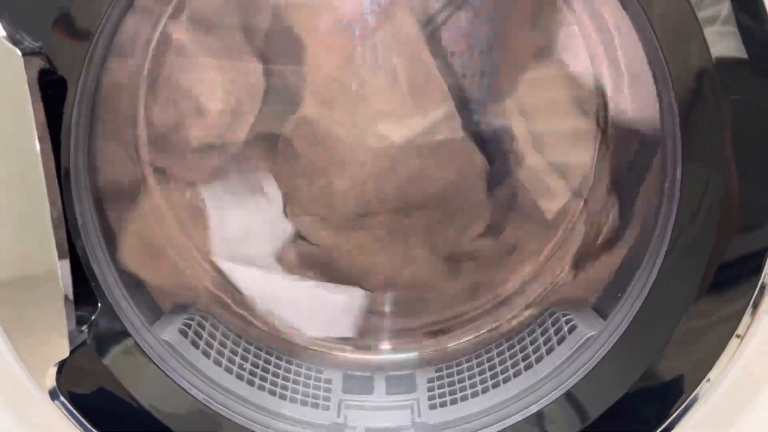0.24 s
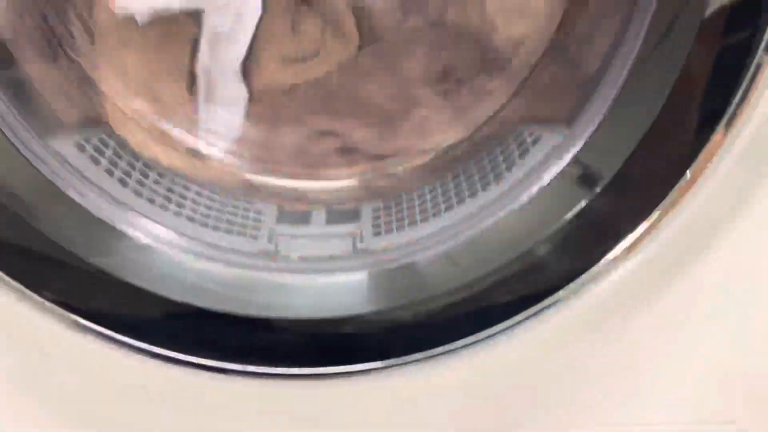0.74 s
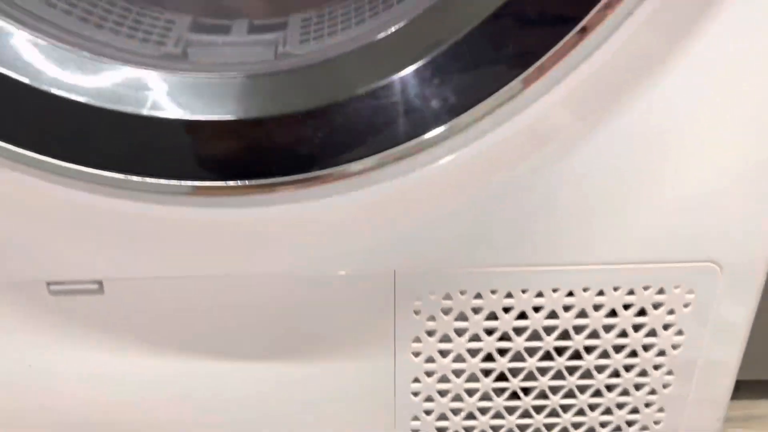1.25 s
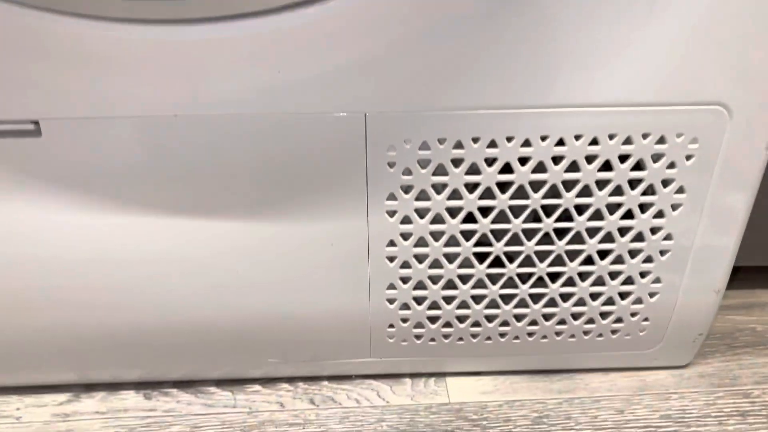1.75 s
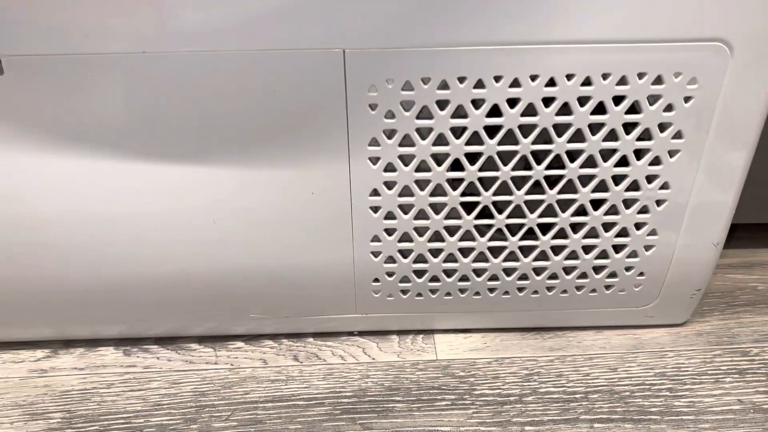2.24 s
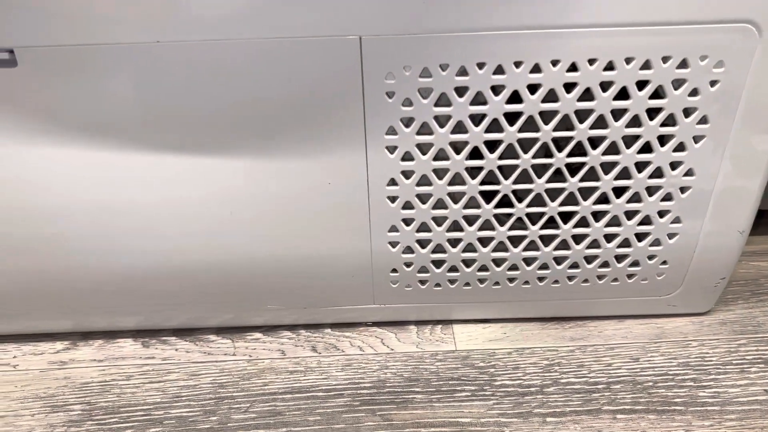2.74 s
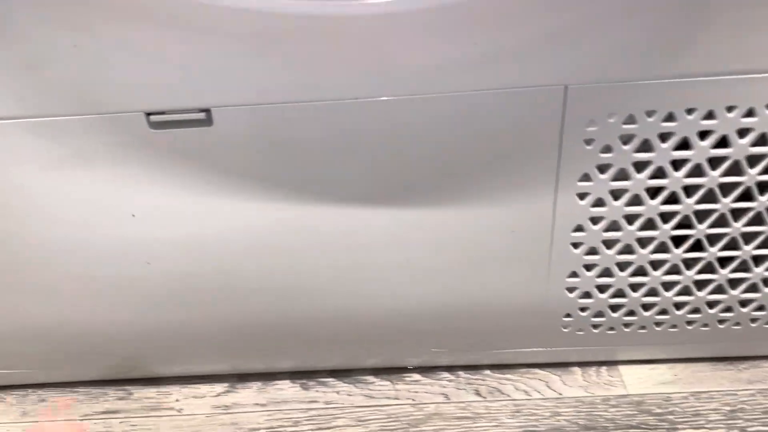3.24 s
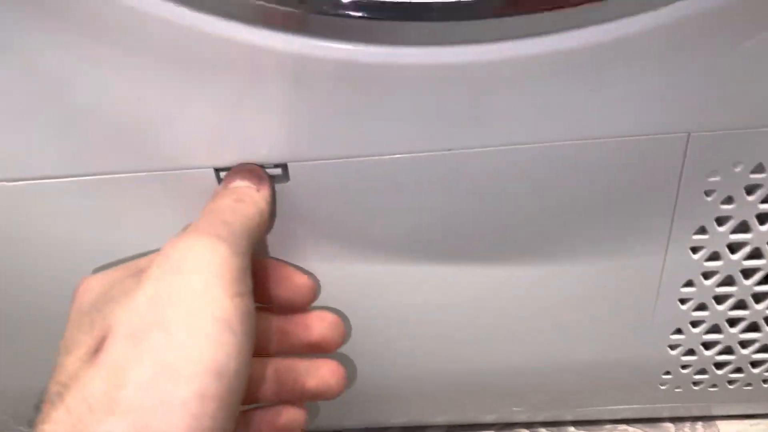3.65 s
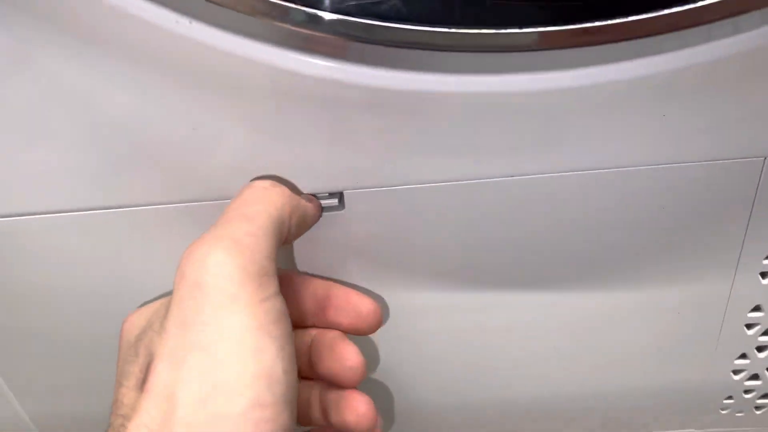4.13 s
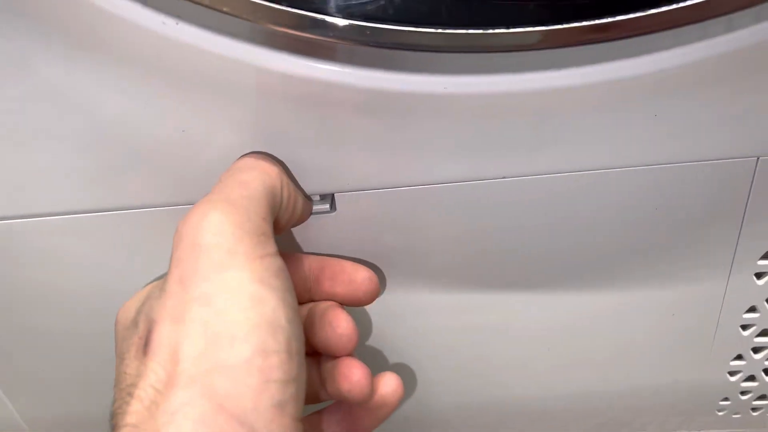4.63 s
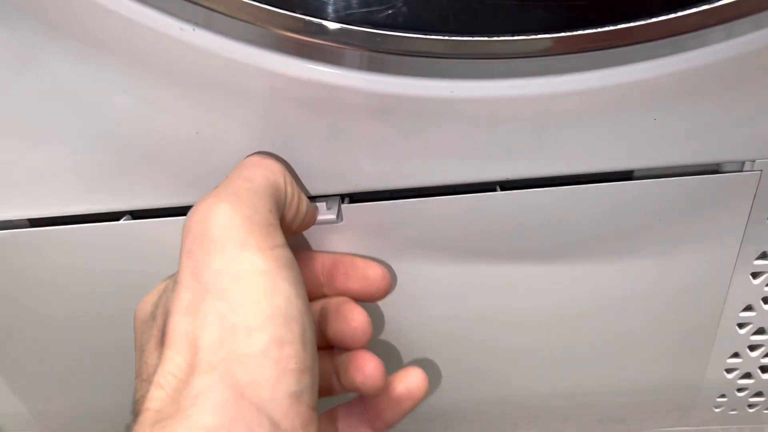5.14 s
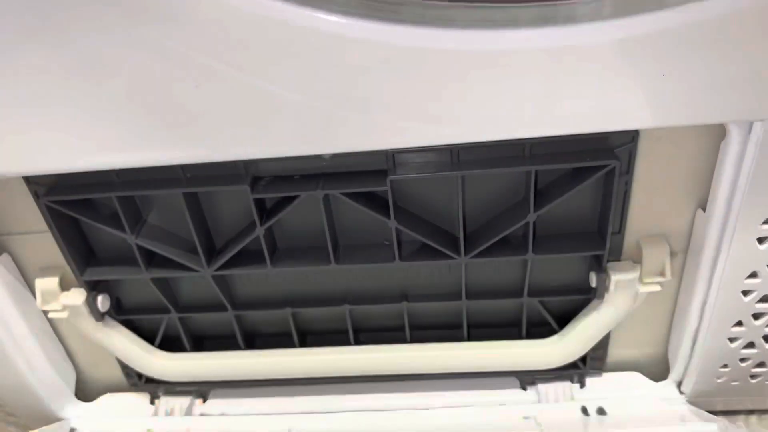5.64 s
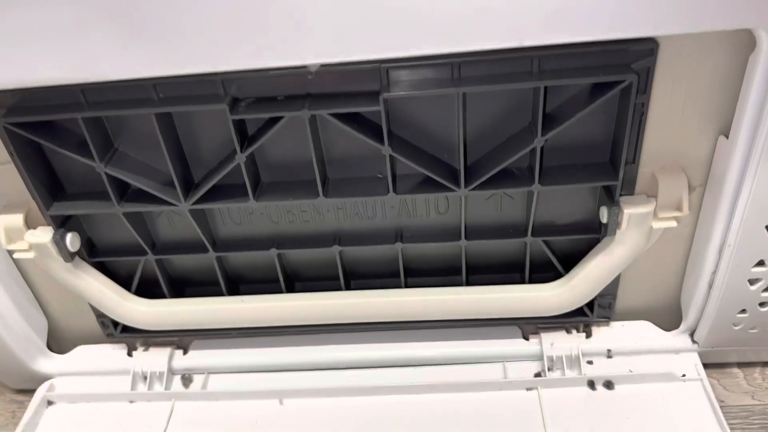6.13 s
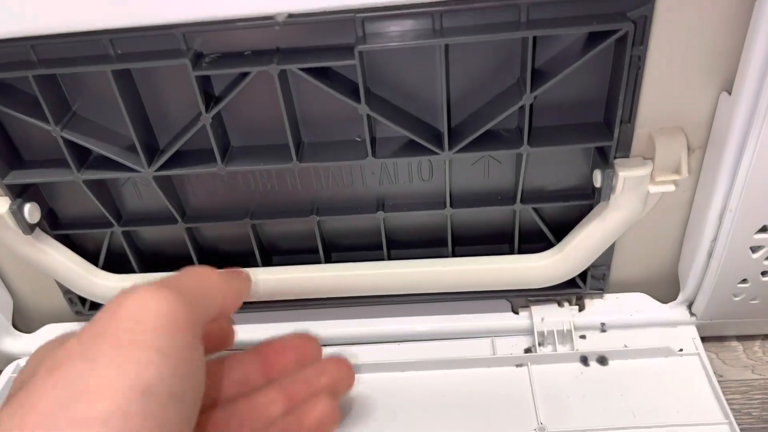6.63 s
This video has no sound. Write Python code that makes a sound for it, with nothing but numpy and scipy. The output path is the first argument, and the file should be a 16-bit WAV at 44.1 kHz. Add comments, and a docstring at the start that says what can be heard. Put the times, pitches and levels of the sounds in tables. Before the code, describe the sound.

Close to a running heat-pump dryer: low throbbing rumble, breathy airflow, thin high compressor whine, muffled laundry thumps and small clicks at the flap.

```python
"""A heat-pump tumble dryer runs while a stereo microphone moves from the door down past the air grille.
From the start the cabinet rumbles, air rushes, resonates and whistles as filtered noise, and the
compressor sings in multiples of its turning speed. Soon clothes knock on the drum and a hand on the
lower flap (bursts ringing in resonances), and the rumble surges (short low tones swell and fade).
Near three seconds the first dry ticks sound close by, made of short bursts of noise."""
import sys
import numpy as np
from scipy import signal
from scipy.fft import rfft, irfft
from scipy.io import wavfile
from scipy.ndimage import uniform_filter1d

SR = 44100
rng = np.random.default_rng(int(sys.argv[2]) if len(sys.argv) > 2 else 0)


def transcribe(signal):
    """Save signal, clipped to [-1, 1], as a 16-bit WAV file at the path in sys.argv[1]."""
    frames = np.atleast_2d(signal).T
    limited = np.clip(frames, -1, 1)
    pcm = np.round(limited * 32767).astype(np.int16)
    wavfile.write(sys.argv[1], SR, pcm)


N = 303408
TIME = np.arange(N) / SR


def amp(db):
    """Turns decibels into gain."""
    return 10 ** (np.asarray(db) / 20)


def evened(x):
    """Scales a signal to an average (rms) level of 1."""
    return x / np.sqrt(np.mean(x ** 2) + 1e-20)


def read(points, hz):
    """Reads a spectrum table at the given frequencies, along a logarithmic pitch scale."""
    f, value = np.transpose(points)
    return np.interp(np.log(hz + 1), np.log(f + 1), value)


def columns(rows, t=TIME):
    """Draws straight lines between the rows of a table and reads each column at the times t."""
    s, *values = np.transpose(rows)
    return [np.interp(t, s, v) for v in values]


def sides(pan_db):
    """Gives left and right gains for a level difference, left minus right."""
    return amp(np.array([pan_db / 2, -pan_db / 2]))


def wander(top_hz):
    """Chance drift of rms 1: twelve sines up to top_hz, the slower ones stronger."""
    speeds_hz = top_hz * np.geomspace(.15, 1, num=12)
    return evened(sum(np.sin(2 * np.pi * (f * TIME + rng.random())) / np.sqrt(f) for f in speeds_hz))


def resonate(x, hz, width):
    """Shifts hz down to zero, smooths, and shifts back; the real part of the result sounds."""
    turn = np.exp(2j * np.pi * np.cumsum(hz * np.ones(x.shape[-1])) / SR)
    r = np.exp(-np.pi * width / SR)
    return 2 * turn * signal.lfilter([1 - r], [1, -r], x / turn)


def noise(points, size, patchy_db, tilt_db=0):
    """Makes stereo noise with a given spectrum, drifting patches and a tilt that may change in time."""
    # how alike left and right are: (frequency [Hz], likeness [-1 to 1])
    likeness = [(60, 0.99), (170, 0.96), (290, 0.77), (520, 0.21), (800, -0.016), (1410, -0.047),
                (6820, -0.035), (8600, -0.65)]
    frames, hz = 4 * N // size + 5, np.fft.rfftfreq(size, 1 / SR)
    a, b, c, d, patches = rng.standard_normal((frames, len(hz), 5)).T
    # smooth the patches across pitch, then across time
    patches = uniform_filter1d(patches, size=12, axis=0)
    patches = evened(uniform_filter1d(patches, size=10, axis=1))
    same = read(likeness, hz)[:, None]
    left = a + 1j * b
    right = same * left + np.sqrt(1 - same ** 2) * (c + 1j * d)
    inside = (hz > points[0][0]) & (hz < points[-1][0])
    level_db = read(points, hz)[:, None] + patchy_db * patches + tilt_db
    z = np.array([left, right]) * inside[:, None] * amp(level_db)
    return signal.istft(z, nperseg=size, noverlap=3 * size // 4)[1][:, :N]


def add(mix, s, sound):
    """Mixes a sound in at time s, cutting it at the end."""
    part = mix[:, round(s * SR):][:, :sound.shape[1]]
    part += sound[:, :part.shape[1]]


def cabinet():
    """Motor and falling load shake the panels: noise in their low resonances, swelling by chance."""
    # rumble before the swell, along the way to the floor:
    # (time [s], low panel level [dB], upper panels level [dB])
    rumble = [(0.0, -34.5, -38), (0.6, -37, -36.5), (1.25, -36, -34), (1.7, -38, -36), (2.2, -34, -32),
              (2.6, -30, -34.5), (3.1, -35, -34), (3.65, -32, -34.5), (3.9, -38.5, -31), (4.25, -34.5, -34),
              (4.7, -32, -36), (4.95, -32.5, -31), (5.7, -32, -33), (6.3, -31.5, -32.5), (6.88, -33.5, -30)]
    # resonances of the panels, shapes only: (frequency [Hz], relative level per Hz [dB])
    low_panel = [(22, -50), (32, -29.5), (45, -7.5), (68, -5), (75, -2.5), (81, 7), (88, 0.5), (95, -5),
                 (106, -4.5), (115, 0.5), (130, -23.5)]
    upper_panels = [(100, -28.5), (118, -9.5), (133, -6.5), (150, -2.5), (160, -4.5), (166, -16),
                    (174, -20), (185, -7.5), (193, -7.5), (205, -27.5), (220, -16.5)]
    swell_db, swell_hz = 0.43, 1.8  # rms size and top speed; both panels swell together
    low_db, upper_db = columns(rumble)
    low = evened(noise(low_panel, size=8192, patchy_db=1.0))
    upper = evened(noise(upper_panels, size=8192, patchy_db=2.0))
    return amp(swell_db * wander(swell_hz)) * (amp(low_db) * low + amp(upper_db) * upper)


def air():
    """Air in the ducts makes a broad rush of noise; three broad humps come and go with position."""
    # the rush along the way:
    # (time [s], level [dB], low hump [dB], middle hump [dB], upper hump [dB])
    rush_curves = [(0.0, -38, 4.5, 6, 0.5), (0.45, -39, 2, 6, 1), (1.2, -38, 1.5, 2, 3),
                   (2.85, -38.5, -1, 1, 1), (3.2, -38, 3, 2, -0.5), (4.0, -37.5, -1.5, 3, -1),
                   (4.55, -38, 3, 0.5, 0.5), (5.6, -38, 1.5, 3, -0.5), (6.0, -37, 5, 3, -2),
                   (6.88, -36.5, -0.5, 1, -3.5)]
    # spectrum of the rush, shape only: (frequency [Hz], relative level per Hz [dB])
    rush_spectrum = [(170, -27.5), (215, -6.5), (258, 3.5), (305, -2), (330, 1), (385, -7), (415, -9),
                     (447, -6.5), (480, -12), (850, -16.5), (940, -15.5), (1700, -20), (2500, -27),
                     (5000, -31), (8600, -32.5), (9100, -34), (9700, -47.5)]
    pan_db, bright_db = 0.74, 1  # left minus right; lift growing over four octaves above 400 Hz
    size = 2048
    frame_s = np.arange(4 * N // size + 5) * (size // 4) / SR
    octave = np.log2(np.fft.rfftfreq(size, 1 / SR)[:, None] + 1e-9)
    _, low_db, middle_db, upper_db = columns(rush_curves, frame_s)
    colour_db = bright_db * np.clip((octave - np.log2(400)) / 4, 0, 1)
    # each hump: its height, its centre in Hz and its half-width in octaves
    for hump_db, hz, octaves in [(middle_db, 900, 0.27), (low_db, 390, 0.23), (upper_db, 1450, 0.31)]:
        colour_db = colour_db + hump_db * np.exp(-((octave - np.log2(hz)) / octaves) ** 2)
    rush = noise(rush_spectrum, size=size, patchy_db=1.3, tilt_db=colour_db)
    return amp(columns(rush_curves)[0]) * sides(pan_db)[:, None] * evened(rush)


def grille():
    """Air resonates in the hollow behind the grille: noise in three close bands, partly shared by both sides."""
    # loudness along the way: (time [s], level [dB])
    loudness = [(0.0, -53.5), (0.73, -54.5), (1.49, -45.5), (2.9, -46), (3.1, -42), (3.7, -47.5),
                (3.98, -45), (4.66, -47.5), (4.95, -44.5), (5.63, -51.5), (6.88, -48.5)]
    # the three close resonances, shape only: (frequency [Hz], relative level per Hz [dB])
    hollow_bands = [(470, -48), (520, -7), (550, 3.5), (585, -3), (625, 5), (665, -1.5), (705, 3),
                    (750, -1.5), (800, -32)]
    hollow = noise(hollow_bands, size=4096, patchy_db=2.0)
    return amp(columns(loudness)[0]) * evened(hollow + 0.41 * hollow[::-1])


def whistle(hz, width, level_db, pan_db, lead, shared):
    """Noise in one narrow resonance; part is common to both microphones, leading on the left (rad)."""
    once = resonate(rng.standard_normal((3, N)), hz, width).real
    common, left, right = resonate(once, hz, width)
    common_pair = common * np.exp([[.5j * lead], [-.5j * lead]])
    pair = shared * common_pair + np.sqrt(1 - shared ** 2) * np.array([left, right])
    return amp(level_db) * sides(pan_db) * evened(pair.real)


def whistles():
    """Rushing air whistles in four fuzzy tones, each a narrow band of noise."""
    # the tones: (frequency [Hz], width of each of two filter passes [Hz])
    tones = [(7210, 170), (7990, 110), (8365, 260), (1630, 34)]
    # one list for each tone: (time [s], level [dB], left minus right [dB])
    curves = [
        [(0.0, -89, -1), (1.28, -86, -2), (1.53, -67, -4), (2.68, -68, -16), (3.6, -69, 7), (4.14, -69, 9),
         (5.36, -70, 2), (5.96, -75, -6), (6.6, -68, 0), (6.88, -69, -1)],
        [(0.0, -69, 15), (0.53, -69, 13), (0.8, -60, 7), (1.3, -62.5, 3), (1.76, -60, -5), (2.7, -62, 3),
         (3.08, -66, -4), (3.25, -59, -2), (3.66, -59.5, 9), (4.3, -60.5, -5), (5.0, -59, -2), (5.55, -69, 18),
         (6.0, -62.5, 2), (6.88, -60, -3)],
        [(0.0, -75, 4), (0.44, -67, 11), (1.15, -75, 2), (1.76, -70, -9), (2.26, -79, -4), (3.1, -69, 5),
         (3.72, -67.5, 15), (5.3, -64, -1), (5.6, -62.5, 3), (6.88, -61.5, -1)],
        [(0.0, -70, 0), (4.6, -64, 0), (5.0, -64, 0), (5.2, -54, 0), (5.35, -68, 0), (6.05, -66, 0),
         (6.2, -53, 0), (6.4, -70, 0), (6.6, -64, 0), (6.88, -68, 0)],
    ]
    # how far each tone's common part leads on the left: (phase [rad])
    leads = [1.6, -2.3, -2.6, 0.5]
    return sum(whistle(hz, width, *columns(rows), lead, shared=0.37)
               for (hz, width), rows, lead in zip(tones, curves, leads))


def compressor():
    """One stroke a turn rings the shell: steady multiples, throbbing where neighbours are strong."""
    # multiples of the turning speed, grouped by shared path: (multiple [turns], relative level [dB])
    shell_orders = [
        [(58, 0), (59, -12), (60, -10), (61, -12)],
        [(67, 0)],
        [(68, 0)],
        [(69, 0), (70, 0), (71, -6), (72, -7), (73, -10)],
        [(78, -13), (92, -8), (93, -10), (94, -9), (95, -9), (96, -10), (97, -10), (111, -10), (113, -8),
         (114, -7), (117, -10), (122, -7)],
        [(104, 0), (105, -14)],
        [(103, 0), (102, -9)],
        [(84, 0), (85, -1), (86, -7)],
    ]
    # how each group reaches the moving microphone, before flutter and the final lift:
    # (time [s], left level [dB], right level [dB], lead of the left [rad])
    shell_paths = [
        [(0.0, -75, -86, 0.1), (0.9, -73, -82, -2.3), (1.5, -64, -71, 1.6), (2.3, -66, -63, -0.5),
         (2.9, -65, -64, -0.5), (3.4, -84, -76, 1.0), (4.3, -67, -68, -0.5), (5.2, -66, -70, -0.8),
         (5.85, -66, -74, -0.6), (6.45, -73, -68, 1.2), (6.88, -63, -67, 0.2)],
        [(0.0, -66, -68, 0.4), (0.45, -64, -87, -2.0), (0.9, -69, -62, -2.9), (1.2, -67, -62, -0.4),
         (1.45, -61, -55, 0.2), (1.9, -62, -56, -0.3), (2.3, -63, -59, -0.6), (2.7, -63, -57, -0.7),
         (2.9, -64, -56, -1.8), (3.0, -68, -60, -2.1), (3.4, -60, -63, -1.7), (3.8, -65, -62, -2.3),
         (4.3, -57, -62, -1.3), (4.75, -60, -64, -1.2), (5.2, -61, -62, -0.8), (5.55, -64, -61, -1.5),
         (5.85, -69, -76, -2.4), (6.1, -59, -68, -3.5), (6.45, -71, -58, -3.0), (6.88, -57, -56, -3.6)],
        [(0.0, -73, -76, 1.6), (0.45, -70, -71, 2.1), (0.9, -71, -64, 3.0), (1.2, -63, -63, 6.1),
         (1.5, -61, -64, 6.5), (1.9, -60, -57, 5.8), (2.3, -61, -59, 5.9), (2.7, -61, -57, 5.7),
         (2.9, -66, -56, 5.6), (3.0, -76, -63, 3.9), (3.4, -65, -71, 4.2), (3.8, -66, -62, 4.1),
         (4.3, -65, -64, 4.9), (4.75, -64, -62, 4.1), (5.2, -62, -60, 4.8), (5.6, -67, -65, 4.0),
         (5.85, -76, -72, 1.6), (6.1, -76, -62, 2.3), (6.45, -70, -60, 4.8), (6.88, -69, -63, 3.0)],
        [(0.0, -72, -75, 2.6), (0.45, -81, -82, -0.1), (0.9, -82, -73, 1.1), (1.2, -73, -74, 0.6),
         (1.5, -78, -73, -0.9), (1.9, -66, -64, -0.1), (2.3, -67, -64, -0.1), (2.7, -64, -63, 0.1),
         (2.9, -70, -64, -0.3), (3.0, -78, -72, -1.0), (3.4, -75, -75, 0.0), (3.8, -75, -80, -0.8),
         (4.3, -70, -77, -2.3), (4.75, -71, -87, -1.4), (5.2, -71, -74, -1.6), (5.6, -86, -79, -2.4),
         (5.85, -74, -73, -4.8), (6.1, -74, -70, -4.6), (6.45, -72, -71, -2.5), (6.88, -68, -71, -2.7)],
        [(0.0, -69, -71, -1.4), (0.9, -75, -70, 0.4), (1.5, -71, -69, 0.2), (2.3, -71, -69, 0.4),
         (2.9, -69, -68, 1.1), (3.4, -66, -70, -2.4), (4.3, -65, -67, -2.8), (5.2, -67, -68, -2.2),
         (5.85, -68, -69, -3.5), (6.45, -65, -68, -4.8), (6.88, -64, -68, -4.7)],
        [(0.0, -69, -76, -0.8), (0.45, -76, -76, 2.0), (0.9, -67, -72, 0.5), (1.2, -66, -71, 0.6),
         (1.5, -66, -70, -0.3), (1.9, -63, -71, 0.1), (2.3, -77, -68, -0.1), (2.7, -72, -68, -0.3),
         (2.9, -73, -68, -0.2), (3.08, -68, -75, 2.3), (3.4, -60, -80, 3.6), (3.8, -56, -63, 2.3),
         (4.3, -57, -63, 2.0), (4.75, -60, -66, 2.1), (5.2, -56, -65, 1.8), (5.6, -60, -66, 2.1),
         (5.8, -63, -68, 2.4), (6.15, -53, -58, 2.4), (6.45, -53, -59, 2.1), (6.88, -56, -66, 1.7)],
        [(0.0, -78, -75, 1.0), (0.9, -72, -75, 0.4), (1.9, -69, -75, 1.0), (2.3, -78, -80, 3.8),
         (2.9, -80, -79, 4.0), (3.5, -67, -75, 3.0), (4.05, -62, -65, 2.6), (4.5, -70, -72, 2.2),
         (5.2, -65, -69, 2.4), (5.85, -70, -80, 2.8), (6.2, -61, -64, 1.3), (6.88, -69, -71, 1.6)],
        [(0.0, -79, -80, -0.6), (1.1, -74, -75, 0.0), (1.9, -70, -69, 0.0), (2.8, -73, -70, 0.5),
         (3.3, -76, -81, 0.0), (4.0, -83, -84, 1.5), (6.0, -80, -78, -0.5), (6.88, -71, -84, 1.0)],
    ]
    turning_hz, lift_db = 48.594, 1
    wobble_turns, wobble_hz = 0.0005, 9.0  # the shaft runs slightly ahead and behind
    flutter_db, flutter_hz = 1.3, 25.0  # rms size and top speed for each group
    # in turns: lead of each group, lag times the square of the step from its first multiple,
    # and the largest random stray of a multiple from one clean stroke
    group_leads, lag_turns, stray_turns = [0, 0.31, 0, 0, 0, 0, 0.3, 0], 0.1, 0.03
    out = np.zeros((2, N))
    turns = turning_hz * TIME + wobble_turns * wander(wobble_hz)
    for orders, rows, ahead in zip(shell_orders, shell_paths, group_leads):
        left_db, right_db, lead = columns(rows)
        first = orders[0][0]
        ring = 0
        for k, db in orders:
            offset = ahead - lag_turns * (k - first) ** 2 + stray_turns * rng.random()
            ring = ring + amp(db) * np.exp(2j * np.pi * (k * turns + offset))
        pair = np.array([ring, ring * np.exp(-1j * lead)]).real
        out += amp([left_db, right_db] + flutter_db * wander(flutter_hz)) * pair
    return amp(lift_db) * out


def top_hiss():
    """A faint, flickering hiss high above the rush: noise nearly alike in both channels."""
    # its spectrum: (frequency [Hz], level per Hz [dB])
    hiss_bands = [(9000, -98), (9700, -102), (10300, -123), (11200, -123), (11700, -95), (12000, -89.5),
                  (14500, -99.5), (15700, -101)]
    middle = noise(hiss_bands, size=1024, patchy_db=4.5)[0]
    side = noise(hiss_bands, size=1024, patchy_db=6.0)[0]
    return middle + .4 * side * np.array([[1], [-1]])


def knocks():
    """Small impacts of clothes, or a hand on the flap, ring resonances within a band tuned for each."""
    # the impacts, level taken over the first 900 samples: (time [s], level [dB],
    # tuning frequency [Hz], time to fall 60 dB before ringing [s], left minus right [dB])
    impacts = [(0.055, -48, 1710, 0.15, -2), (0.245, -41, 790, 0.048, 2), (0.252, -41.5, 1900, 0.31, -1),
               (0.263, -45, 870, 0.06, -1), (0.307, -51.5, 1720, 0.32, -5), (0.507, -51, 950, 0.34, 2),
               (0.953, -43.5, 1780, 0.29, 1), (0.968, -48, 1370, 0.054, -8), (1.212, -48, 905, 0.28, 4),
               (1.241, -55, 2300, 0.11, -2), (1.298, -44.5, 1100, 0.17, -3), (1.324, -36, 690, 0.09, -1),
               (1.428, -41, 1030, 0.22, 3), (1.457, -47, 820, 0.11, -5), (1.947, -42, 1930, 0.16, 0),
               (1.969, -46.5, 1200, 0.53, 0), (1.977, -38, 1070, 0.039, 4), (2.041, -49, 1690, 0.15, -6),
               (2.163, -40.5, 1770, 0.18, 3), (2.177, -41, 1780, 0.045, -3), (2.183, -40.5, 715, 0.08, -10),
               (2.209, -46, 1610, 0.24, 0), (2.953, -45.5, 1290, 0.48, -7), (2.98, -47, 2600, 0.11, 6),
               (3.01, -47, 1450, 0.15, 4), (3.15, -48, 1300, 0.19, -3), (3.471, -46, 645, 0.062, -3),
               (3.553, -36.5, 655, 0.038, -3), (3.554, -36, 1400, 0.069, 1), (3.576, -46, 1330, 0.066, -2),
               (3.596, -49, 1210, 0.06, -6), (3.871, -41, 1150, 0.096, 6), (3.89, -36.5, 634, 0.043, -2),
               (3.901, -43, 780, 0.36, -4), (3.97, -42, 1950, 0.34, -1), (4.059, -43, 1000, 0.14, 9),
               (4.066, -44.5, 1190, 0.05, -9), (4.386, -44, 885, 0.042, 2), (4.485, -41, 820, 0.079, 0),
               (4.635, -48, 2500, 0.21, 1), (4.83, -48.5, 1590, 0.31, -2), (4.889, -44, 1600, 0.17, 0),
               (4.93, -47, 2190, 0.12, 4), (4.972, -39, 960, 0.1, 1), (5.251, -48, 1540, 0.08, 0),
               (5.758, -51.5, 2200, 0.12, -4), (6, -48.5, 1680, 0.2, -2), (6.026, -48.5, 1850, 0.24, -2)]
    # resonances of the drum: (frequency [Hz], half-width [Hz], relative level [dB])
    drum_modes = [(650, 40, 5), (850, 100, -5), (1060, 80, -2), (1340, 70, -1), (1600, 90, -2),
                  (1800, 80, 1), (2050, 100, 0), (2400, 120, -3), (2700, 140, -5), (3750, 300, -8)]
    # knocks shorter than the first are hard and rise fast
    hard_length_s, hard_rise_s, soft_rise_s = 0.1, 0.0025, 0.009
    # only rare large slips stand out as taps of buttons and seams
    tap_size, tap_db = 2.4, -1.0
    strike_db, strike_sharpness = -3.5, 2.2  # the one clean blow that starts a hard knock
    out, t, f = np.zeros((2, N)), np.arange(8192) / SR, np.fft.rfftfreq(8192, 1 / SR)
    modes = np.array([(-1) ** k * amp(mode_db) / (1 + 2j * (f - hz) / width)
                      for k, (hz, width, mode_db) in enumerate(drum_modes)])

    def start_level(x):
        return np.sqrt((x[..., :900] ** 2).mean())

    for s, db, tuning_hz, length, pan_db in impacts:
        hard = length < hard_length_s
        rise = hard_rise_s if hard else soft_rise_s
        common, left, right, lumps = rng.standard_normal((4, len(t)))
        # each spot on the drum favours other modes
        drum = amp(rng.uniform(-3, 3, len(drum_modes))) @ modes
        blow = (1 - np.exp(-t / rise)) * amp(-60 * t / length)
        blow *= amp(2.1 * evened(uniform_filter1d(lumps, size=110)))  # folds land unevenly
        taps = evened(common * (abs(common) > tap_size))
        scuff = (amp(tap_db) * taps + np.array([left, right])) * blow
        # the band peaks near 0.6 of the tuning frequency and falls steeply above
        x = 1j * f / tuning_hz
        band = x ** 2 / (1 + 2.3 * x + x ** 2) ** 3.13
        ring = irfft(rfft(scuff) * drum * band)
        if hard:
            strike = irfft(drum / (1 + strike_sharpness * (x + 1 / (x + 1e-9))) ** 3)
            ring = ring / start_level(ring) + amp(strike_db) * strike / start_level(strike)
        add(out, s, amp(db) * sides(pan_db)[:, None] * ring / start_level(ring))
    return out


def surges():
    """Low surges of the rumble: three short low tones swell and fade, alike in both channels."""
    # the surges: (time [s], low tone peak [dB], middle tone peak [dB], high tone peak [dB])
    surge_rows = [(0.088, -47, -29, -53), (0.792, -34, -29.5, -49), (1.2, -28, -29, -46),
                  (1.574, -36, -52, -41.5), (1.731, -23.5, -30.5, -49), (2.049, -32, -35, -37),
                  (2.534, -35, -31, -29), (2.737, -30, -44, -41), (3.341, -41, -35, -49),
                  (3.629, -24.5, -40, -48), (4.159, -32.5, -22.5, -33.5), (4.451, -31.5, -24.5, -40),
                  (4.62, -48, -50, -32), (4.876, -25, -29, -34.5), (5.24, -43, -35, -37),
                  (5.419, -27.5, -23, -42), (5.897, -27, -27, -46), (6.179, -26.5, -35, -47),
                  (6.505, -41, -22.5, -45), (6.759, -28, -34, -46)]
    tones_hz = (83.8, 147.7, 256)  # each surge strays up to 4 percent from these
    rise_s, fall_60db_s = 0.037, 0.18
    out, t = np.zeros((2, N)), np.arange(SR // 2) / SR
    swell = (1 - np.exp(-t / rise_s)) ** 2 * amp(-60 * t / fall_60db_s)
    swell = swell / swell.max()
    for (s, *levels_db), chance in zip(surge_rows, rng.random((len(surge_rows), 6))):
        tones = 0
        for hz, db, (stray, phase) in zip(tones_hz, levels_db, chance.reshape(3, 2)):
            tone_hz = hz * (.96 + .08 * stray)
            tones = tones + amp(db) * np.sin(2 * np.pi * (tone_hz * t + phase))
        add(out, s, np.tile(swell * tones, (2, 1)))
    return out


def ticks():
    """Short dry ticks close by: quick bursts of noise in one band each, with a weaker, longer tail."""
    # one row for each band a tick sounds in, level taken over the first 60 samples:
    # (time [s], level [dB], centre [Hz], width of each filter pass [Hz], left minus right [dB])
    tick_bands = [(2.927, -60, 13500, 2500, 0), (2.933, -45.5, 1740, 800, 16), (2.934, -57, 9000, 12000, 2),
                  (3.013, -47.5, 6000, 2000, 22), (3.0145, -56, 11000, 9900, 5),
                  (3.015, -48, 2410, 2500, 14), (3.555, -42, 3400, 3000, 7), (4.072, -51, 4500, 4000, 5),
                  (4.28, -56, 12700, 2500, 0), (4.335, -54, 13000, 3500, 0), (4.345, -46.5, 3800, 2500, 7),
                  (4.973, -49, 2200, 1800, -2), (4.973, -51, 4500, 3000, 4)]
    out, t = np.zeros((2, N)), np.arange(2400) / SR
    # the burst falls 60 dB in 0.016 s, its tail in 0.16 s
    fade = amp(-60 * t / 0.016) + amp(-7.5 - 60 * t / 0.16)
    for s, db, hz, width, pan_db in tick_bands:
        burst = rng.standard_normal((2, len(t))) * fade
        band = burst + 0.29 * burst[::-1]  # some of each side leaks into the other
        for _ in range(3):
            band = resonate(band, hz, width).real
        start_level = np.sqrt((band[:, :60] ** 2).mean())
        add(out, s, amp(db) * sides(pan_db)[:, None] * band / start_level)
    return out


def scene():
    """Adds all the sources together."""
    steady = cabinet() + air() + grille() + whistles() + compressor() + top_hiss()
    return steady + knocks() + surges() + ticks()


def record(dry):
    """The recorder's band limit: a steep filter removes the sound above its edge."""
    edge_hz = 15735
    low_pass = signal.firwin(2047, edge_hz, window=("kaiser", 9), fs=SR)
    return signal.oaconvolve(dry, low_pass[None], "same")


dry = scene()
out = record(dry)
transcribe(out)
```